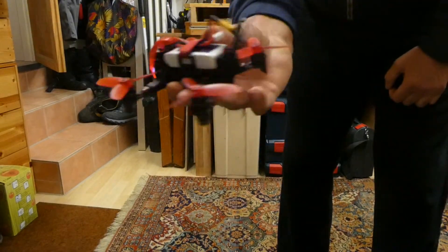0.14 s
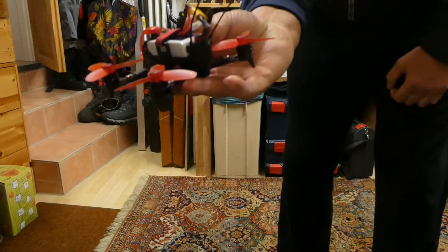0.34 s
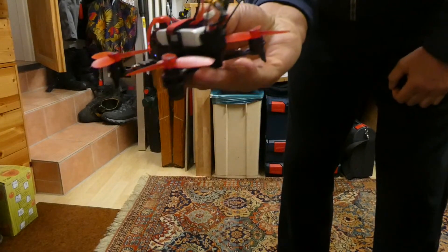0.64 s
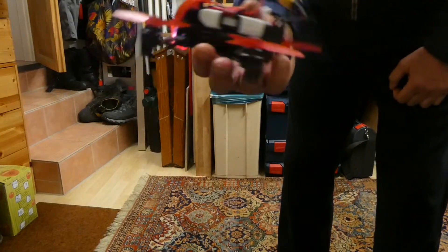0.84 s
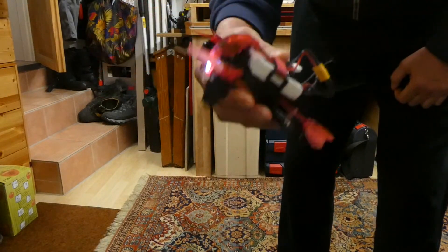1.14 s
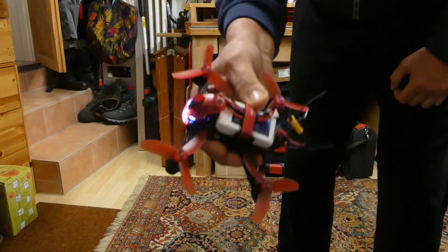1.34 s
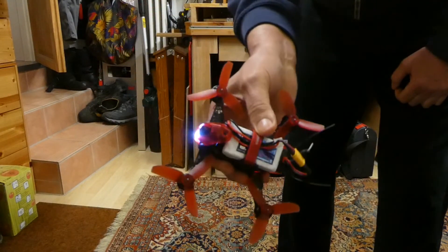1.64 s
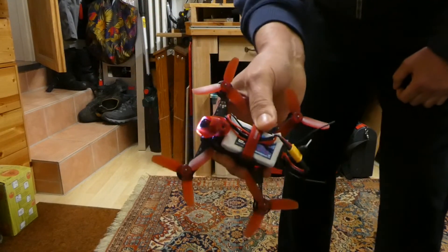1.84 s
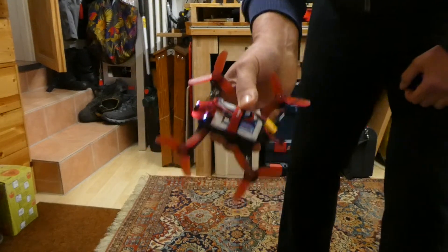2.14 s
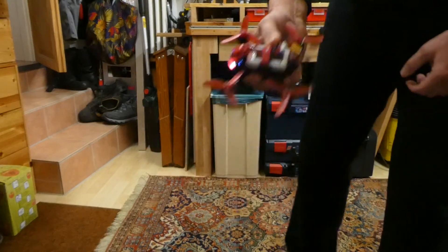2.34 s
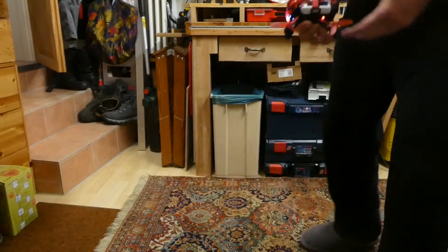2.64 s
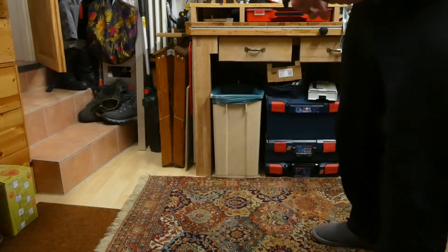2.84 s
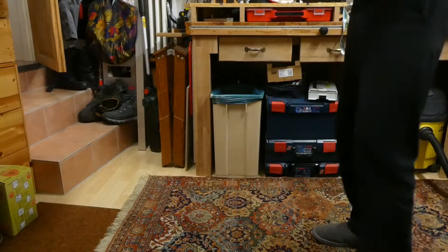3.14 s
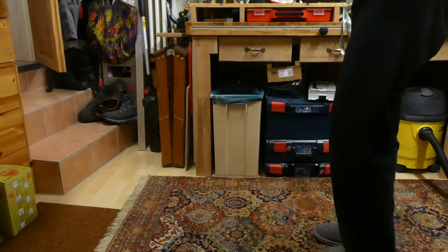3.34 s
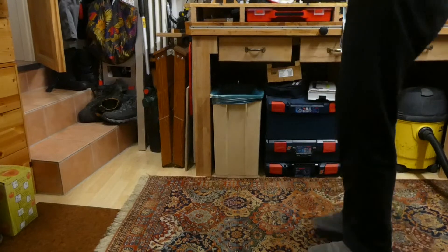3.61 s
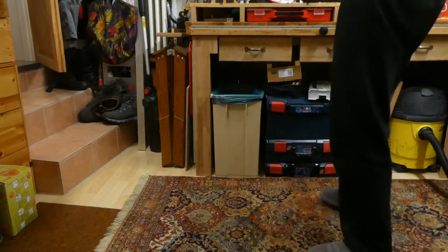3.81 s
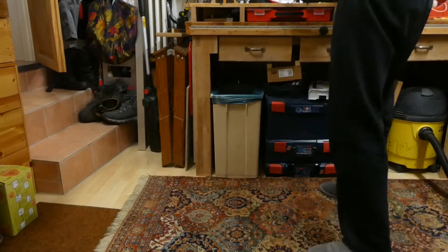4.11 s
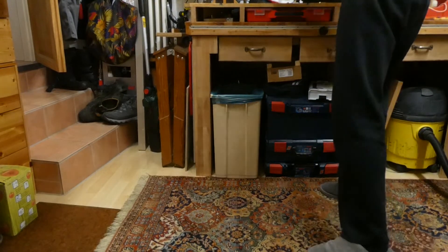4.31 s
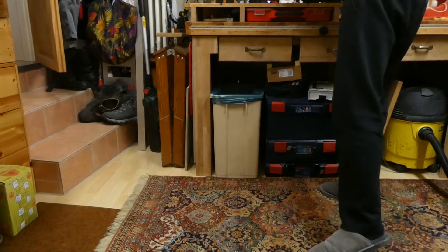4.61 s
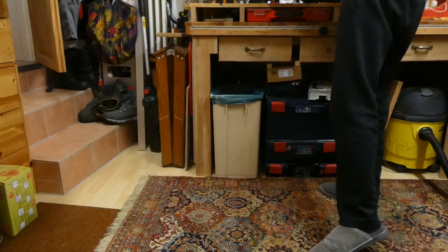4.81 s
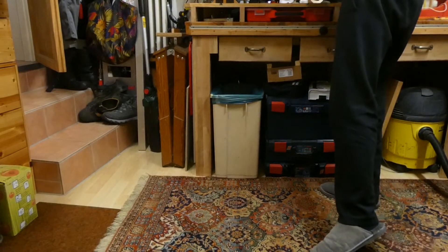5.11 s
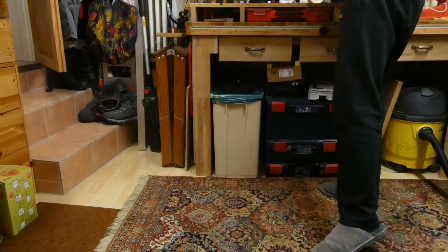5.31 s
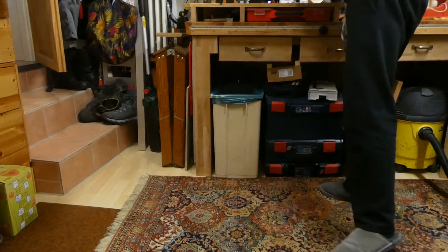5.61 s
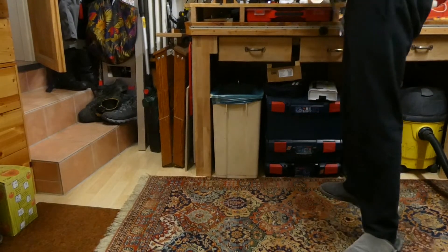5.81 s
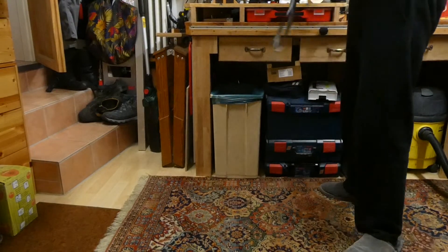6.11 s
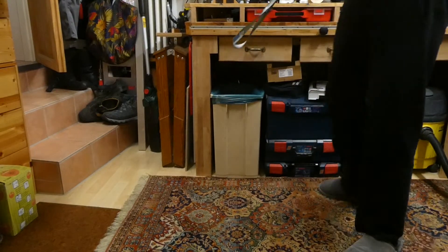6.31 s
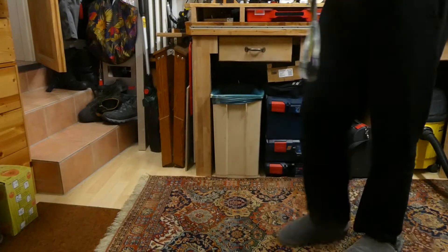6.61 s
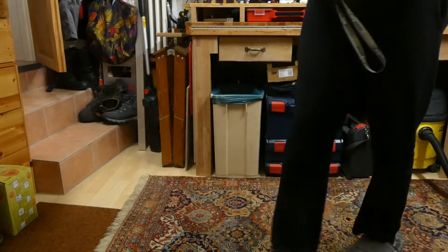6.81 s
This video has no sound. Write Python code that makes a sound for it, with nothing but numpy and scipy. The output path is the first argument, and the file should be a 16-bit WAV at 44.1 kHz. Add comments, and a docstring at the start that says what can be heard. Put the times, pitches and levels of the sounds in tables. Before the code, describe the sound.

Throughout about 7 seconds, a steady machine hum holds one middle pitch, with thin fan whine, low hollow air rush and soft hiss in a small hallway workshop. From 0.1 to 0.3 s a plastic model gives tiny dry ticks in the hand; faint brushing and thin squeaky hisses continue until 2.4 s. A small click comes at 2.7 s, then dull steps and knocks at about 3.0, 3.4, 3.7 and 4.0 s, while the hum dips slightly. After a woody knock at 4.4 s, an object rattles on the bench at 4.6 s and lands with the loudest, bright hard crack at 4.8 s, bouncing briefly. Soft rustles follow. Around 5.7 s come a clump of clicks and a swish, then a sharp click at 6.0 s and a duller one at 6.6 s, as a strap is handled. Echoes are short, the microphone fairly close.

```python
"""From the start machines hum as steady sines, over air rush and hiss made of coloured noise in a small hallway.
A small plastic model clicks in the hand as gritty noise puffs; soft noise strokes make rustles and faint squeaks.
Then come steps over a rug to a wooden bench, thuds and knocks of banded noise, while hum tones swell and dip.
A thing clatters down on the bench in a run of blows, each ringing decaying modes under a bright crack.
Last a strap is picked up, with more clicks, knocks and rustles; the handling echoes in the hallway."""
import sys
import numpy as np
from scipy import signal
from scipy.fft import rfft, irfft, next_fast_len
from scipy.io import wavfile
from scipy.ndimage import uniform_filter1d, map_coordinates

SR = 44100
rng = np.random.default_rng(int(sys.argv[2]) if len(sys.argv) > 2 else 0)


def dump_mix(stems):
    """Bounce the given channels to the path in sys.argv[1] as a 16-bit WAV at rate SR."""
    frames = np.atleast_2d(stems).T  # one column per channel
    limited = np.clip(frames, -1, 1)  # hard clip at full scale
    pcm = np.round(limited * 32767).astype(np.int16)
    wavfile.write(sys.argv[1], SR, pcm)


N = 306495

# Shaft tones of a fan. Each row: multiple of the shaft rate, level in dB rms, left over right in dB,
# left phase lead in radians.
FAN_TONES = [(30, -72, 0, 0), (36, -76, 0, 0), (45, -73, -7.7, .3), (48, -80, 1.5, -.3),
             (53, -75, -2.1, .2), (55, -76, -.6, .3), (62, -74, -3.2, .3), (63, -77, -2.7, .5),
             (64, -73, 1.4, .4), (65, -61.5, -.9, .3), (70, -72, -1.6, .5), (75, -66.5, -.5, .2),
             (80, -76, -.5, -.1), (90, -74, -7.2, -.6), (94, -77, 0, 0), (95, -73.5, -2.3, .1),
             (96, -77, -5.9, .3), (100, -79, -2.9, -.6), (105, -62, -.4, .1), (110, -79, 3.5, .3),
             (115, -80, 2.2, 0), (150, -84, 1.1, -.2)]
# A second motor's whine. Each row: harmonic number, level in dB rms, left over right in dB,
# left phase lead in radians.
WHINE_TONES = [(1, -56, -2, -.1), (2, -58, 1.1, -.7), (3, -72, -3, -.1), (4, -72, -.8, .7)]
# Sudden dips of the main hum, each held for a while, as the body stands in its standing wave.
# Each row: start in seconds, end in seconds, depth in dB.
HUM_DIPS = [(2.928, 4.163, 3.5), (6.53, 7.2, 5)]
# Single fan tones swell or sink as the body passes. Each shaft multiple has rows: middle in seconds,
# length in seconds, change in dB.
FAN_SWELLS = {65: [(.3, .6, -1), (1.45, 1.1, 3), (4, .9, 1), (5.6, .8, -4), (6.45, .3, 3)],
              75: [(1.7, 1, -4.5), (4.1, .5, -5.5), (6, .9, -4.5)], 95: [(1.9, 1.5, 10), (3.5, .5, 6),
              (5.9, .4, 6), (6.75, .8, 8)], 105: [(.5, .7, 2.5), (1.55, .7, 4), (5.5, .5, -2.5)]}
# Low room resonances that the air rush fills. Each row: centre in Hz, width in Hz, relative level in dB.
RUSH_MODES = [(76.4, 16.8, -5.5), (115, 62, -22), (195.4, 24.76, 2), (219.6, 25.3, -4), (272.2, 51, -13),
              (328.2, 42.9, 0.5), (388, 20.4, -3), (429.4, 68.5, -3), (486.1, 34.4, -3.5),
              (578.6, 65.4, -10), (700.8, 82, -8.5), (793.1, 53, -8.5), (962, 13.3, -8)]
# The rush's noise bed between those resonances. Each row: frequency in Hz, relative level in dB per Hz.
RUSH_BED = [(20, 0), (38, -4.5), (58, -28.5), (140, -33.5), (300, -20.5), (900, -23), (1100, -69)]
# Colour of the upper air noise and microphone hiss. Each row: frequency in Hz, relative level in dB per Hz.
HISS_COLOUR = [(500, -45.5), (900, 0.5), (1250, 3), (1600, -3.5), (2100, 0), (2550, -6.5), (3200, -11.5),
               (4500, -21.5), (6500, -23.5), (8200, -27), (10000, -22.5), (12500, -29), (15000, -31.5),
               (16000, -44)]
# Likeness of the two channels of noise. Each row: frequency in Hz, correlation from -1 to 1.
LIKENESS = [(60, -0.47), (130, -0.446), (290, 0.353), (640, -0.487), (1410, 0.25), (3100, 0.452),
            (6820, 0.504), (15000, 0.46)]
# Level of the treble noise over time, hiss with brief rises around the clatter and clicks.
# Each row: time in seconds, level in dB rms.
TREBLE_LEVEL = [(0, -66), (1.8, -67), (2.3, -64), (2.8, -64.5), (3.64, -63.5), (3.85, -65.5), (4.4, -66.5),
                (4.75, -60), (4.95, -65), (5.4, -63.5), (5.72, -61.5), (6.05, -66), (6.5, -63.5),
                (6.95, -63.5)]
# Dry clicks of plastic and buckle. Each row: start in seconds, body level in dB, body centre in Hz,
# body spread in octaves, snap level in dB.
CLICK_EVENTS = [(0.136, -74.5, 3000, .5, -49), (.2643, -72, 3000, .5, -52),
                (0.3035, -71.5, 3000, .5, -47.5), (2.7136, -66.5, 3000, .5, -48.5),
                (5.683, -44, 2200, 0.5, -51), (5.701, -38, 2214, 0.41, -62), (5.717, -36, 2120, 0.25, -61),
                (5.723, -39.5, 2075, .18, -65.5), (5.7717, -35.5, 1760, 0.45, -41),
                (6.0268, -34, 2890, 0.83, -37.5), (6.6412, -38, 1470, 0.71, -55.5),
                (6.652, -42.5, 785, 0.48, -59.5)]
# Soft strokes of noise: broad cloth rustles, and narrow faint hisses or squeaks. Each row: middle in seconds,
# level in dB, half length in seconds, centre in Hz, spread in octaves.
SOFT_STROKES = [(0.191, -67.5, 0.052, 10000, 0.41), (0.742, -60, 0.04, 11000, 1.16),
                (.88, -62, 0.021, 6700, .18), (.925, -62.5, 0.0375, 6700, 0.21),
                (1.748, -65.5, 0.068, 11000, 1.5), (2.148, -66, 0.078, 4830, 0.28),
                (2.357, -67.5, 0.243, 4720, 0.196), (2.78, -57, 0.108, 9000, 3.1),
                (3.439, -56.5, .04, 5000, 1.57), (3.729, -58.5, 0.0397, 7000, 1.7),
                (4.379, -65, 0.047, 7000, 1.3), (4.735, -60, .04, 12000, 0.43),
                (5.162, -60.5, .043, 8000, 2), (5.384, -59.5, .06, 7000, 2.9),
                (5.529, -62.5, 0.049, 5000, 1.53), (5.62, -65, 0.056, 9500, .5),
                (5.72, -44.5, 0.0422, 5000, 2.8), (5.868, -61, 0.106, 5000, 1.45),
                (6.74, -58, 0.0297, 9000, 2.1)]
# Knocks of feet and hands, mostly broad, with two narrow rings of the bench. Each row: start in seconds,
# level in dB, centre in Hz, spread in octaves.
KNOCK_EVENTS = [(2.955, -33, 686, 1.29), (2.975, -48, 1500, 0.9), (3.05, -42, 600, 0.75),
                (3.421, -36.5, 990, 1.02), (3.432, -35.5, 1066, 1.084), (3.511, -43.5, 800, 0.47),
                (3.706, -36, 697, 1.186), (3.722, -51.5, 1300, 1.0), (3.978, -41, 800, 1.12),
                (4.049, -40, 800, 1.01), (4.372, -36.5, 469, 0.23), (5.52, -45, 2050, 0.44),
                (5.71, -36.5, 474, 0.144), (5.865, -43.5, 1500, 0.93), (6.125, -50, 1200, 1.5)]
# Heel thuds. Each row: start in seconds, level in dB, centre in Hz.
HEEL_THUDS = [(2.956, -43.5, 171), (3.424, -40, 150), (3.985, -45, 85), (3.986, -34, 202),
              (4.06, -46.5, 110), (4.108, -48.5, 100)]
# Two drops on the bench with their bounces. Each row: start in seconds, level in dB,
# hardness from 0 (lands flat) to 1 (on a hard edge).
CLATTER_BLOWS = [(4.576, -25.5, 0.386), (4.583, -27, 0.048), (4.609, -28.5, 0.74), (4.617, -32.5, 0.071),
                 (4.635, -35, 0.047), (4.651, -28.5, 0.36), (4.676, -36.5, 0.085), (4.7727, -13.5, 0.913),
                 (4.783, -25, 0.022), (4.808, -23, 0.425), (4.828, -33, 0.0196), (4.851, -41, .02)]
# Modes of the bench and the dropped thing. Each row: frequency in Hz, relative level in dB,
# 60 dB decay time in seconds.
BENCH_MODES = [(240.5, -14, 0.119), (323.7, -12, 0.093), (361, -7.5, 0.094), (427.4, 6, 0.0713),
               (460.9, -7, 0.394), (494.6, 1, 0.176), (581, -9.5, 0.092), (629.3, -6.5, 0.073),
               (765, -15, 0.073), (899, -7, 0.113), (911.6, -1.5, 0.068), (1049, -1.5, 0.037),
               (1136, -10, 0.062), (1253.2, -0.5, 0.054), (1403.5, -5, 0.0385), (1600, -16, 0.049),
               (1677, -7.5, 0.042), (1921.3, -5.5, 0.0535), (2134, -1.5, 0.0208), (2373, -10.5, 0.019),
               (2690, -5, 0.038), (2917, -2.5, 0.021), (3630, -21.5, 0.019)]
# Colour of a blow's treble crack. Each row: frequency in Hz, relative level in dB.
CRACK_COLOUR = [(2300, -22), (3300, 6.5), (4100, -1), (5000, -3), (6300, 0.5), (7600, -8), (9500, -8.5),
                (11500, -14), (16000, -25)]
# Echo decay of the hallway. Each row: frequency in Hz, 60 dB decay time in seconds.
ROOM_DECAY = [(200, 0.418), (1000, 0.158), (4000, 0.145), (12000, 0.0954)]

HUM_HZ, SHAFT_HZ, WHINE_HZ = 423.87, 19.3336, 340.99
HUM_DB, DIP_RAMP_S = -42, 0.083
RUSH_DB, MID_DB = -47, -55.5
MID_FOLLOWS = 0.28  # share of the treble's level changes, in dB, that the middle band follows
STEP_ASIDE_S, UNSHADED_DB = 2.455, 1.5  # the body stops shading the microphones; the middle band rises
CLICK_T60_S, SNAP_HZ, SNAP_OCT = 0.1004, 9490, 0.6
SNAP_T60_S, HEAVY_DB = (0.0119, 0.0785), -55  # a snap rings longer on a body louder than this
KNOCK_T60_S, THUD_T60_S, THUD_OCT = 0.1004, 0.12, 0.245
# a blow landing flat, and on an edge: chatter t60 in seconds, low ring in dB, treble crack in dB
FLAT, EDGE = (0.1027, 5.8, -12.5), (0.047, -31, -5)
TICK_DB, TICK_HZ, TICK_T60_S = (-19.5, -2.5), 9166, 0.0189  # first touch; its level runs from flat to edge
TOP_HZ = 15700


def amp(db):
    """Gain of a level in dB."""
    return 10 ** (np.asarray(db) / 20)


def unit(x):
    """x at rms 1."""
    return x / np.sqrt(np.mean(x ** 2) + 1e-20)


def along(points, hz):
    """Reads (Hz, value) points at hz, on a log frequency axis."""
    f, v = np.transpose(points)
    return np.interp(np.log(hz + 1), np.log(f + 1), v)


def wobble(rate):
    """A smooth random curve, rate knots a second."""
    knots = rng.standard_normal(int(N * rate / SR) + 4)
    return map_coordinates(knots, [np.arange(N) * rate / SR])


def plateau(start, end, ramp):
    """Near 0 outside, near 1 between start and end, with smooth shoulders."""
    t = np.arange(N) / SR
    return (np.tanh((t - start) * 2 / ramp) - np.tanh((t - end) * 2 / ramp)) / 2


def filtered(x, response):
    """x shaped by a gain that depends on frequency."""
    n = x.shape[-1]
    m = next_fast_len(n + 8192)
    return irfft(rfft(x, m) * response(np.fft.rfftfreq(m, 1 / SR)), m)[..., :n]


def band(n, centre_hz, octaves, density=1):
    """n samples of noise, rms 1, in a bell-shaped band on a log axis; low density makes it gritty."""
    def bell(hz):
        distance = np.log2((hz + 1) / centre_hz) / max(octaves, .1)
        return np.exp(-.5 * distance ** 2) / np.sqrt(hz + 50)

    grains = rng.standard_normal(n) * (rng.random(n) < density)
    return unit(filtered(grains, bell))


def add(track, s, sound):
    """Mixes sound into track from second s on."""
    start = round(s * SR)
    part = track[..., start:start + sound.shape[-1]]
    part += sound[..., :part.shape[-1]]


def tone(hz, db, pan_db, lead):
    """A sine of fixed pitch, differing in level and phase between the two microphones."""
    side = np.array([[.5], [-.5]])
    phase = 2 * np.pi * (hz * np.arange(N) / SR + rng.random())
    return np.sqrt(2) * amp(db + pan_db * side) * np.sin(phase + lead * side)


def machines():
    """Rotating machines give pure tones; each drifts in level on its own, and standing waves shift some."""
    dips_db = sum(depth * plateau(start, end, DIP_RAMP_S) for start, end, depth in HUM_DIPS)
    out = tone(HUM_HZ, HUM_DB - dips_db + .6 * wobble(2.5), -.2, -.3)
    for order, db, pan_db, lead in FAN_TONES:
        swell_db = 0
        for middle, length, change in FAN_SWELLS.get(order, []):
            swell_db = swell_db + change * plateau(middle - length / 2, middle + length / 2, length / 2)
        drift_db = (.8 if order in FAN_SWELLS else 2.2) * wobble(1.465)
        out += tone(order * SHAFT_HZ, db + swell_db + drift_db, pan_db, lead)
    for harmonic, db, pan_db, lead in WHINE_TONES:
        out += tone(harmonic * WHINE_HZ, db + 0.65 * wobble(1.415), pan_db, lead)
    return out


def noise(gain, patchy_db):
    """Stereo noise, coloured by gain(Hz), with patches of random gain in time and frequency."""
    z = signal.stft(rng.standard_normal((2, N)), nperseg=512)[2]
    field = uniform_filter1d(rng.standard_normal(z.shape[1:]), 6, 0)
    field = uniform_filter1d(field, 14, 1)
    pair = signal.istft(z * amp(patchy_db * unit(field)), nperseg=512)[1][:, :N]

    def mid_side_gain(hz):
        turn = np.arccos(np.clip(along(LIKENESS, hz), -1, 1)) / 2  # sets the channels' correlation
        return gain(hz) * [np.cos(turn), np.sin(turn)]

    mid, side = filtered(pair, mid_side_gain)
    return np.array([mid + side, mid - side])


def air():
    """Turbulent air fills the room's low resonances; the treble noise above rises briefly around the handling."""
    times, levels = np.transpose(TREBLE_LEVEL)
    treble_db = np.interp(np.arange(N) / SR, times, levels)
    unshaded_db = UNSHADED_DB * plateau(STEP_ASIDE_S, 99, 0.31)
    mid_db = MID_DB + MID_FOLLOWS * (treble_db - treble_db.mean()) + unshaded_db
    hiss = noise(lambda hz: amp(along(HISS_COLOUR, hz)), patchy_db=1.47)
    treble = filtered(hiss, lambda hz: 1 / (1 + (4300 / (hz + 1)) ** 6))
    middle = hiss - treble

    def rush_gain(hz):
        modes = sum(amp(db) / (1 + (2 * (hz - centre) / width) ** 2) for centre, width, db in RUSH_MODES)
        return np.hypot(modes, amp(along(RUSH_BED, hz)))

    rush = amp(RUSH_DB + 0.8 * wobble(1.415)) * unit(noise(rush_gain, patchy_db=1.24))
    rush = rush * amp([[-.6], [.6]])  # leans right
    return rush + amp(mid_db) * unit(middle) + amp(treble_db) * unit(treble)


def contacts(rows, rise, density):
    """Each contact is a puff of noise that rises fast and dies away."""
    out, t = np.zeros(N), np.arange(SR // 3) / SR
    for s, db, hz, octaves, t60 in rows:
        envelope = amp(db - 60 * t / t60) * (1 - np.exp(-t / rise))
        add(out, s, envelope * band(len(t), hz, octaves, density))
    return out


def clicks():
    """A click is a banded noise puff for the part's body plus a bright, gritty snap."""
    bodies, snaps = [], []
    for s, db, hz, octaves, snap_db in CLICK_EVENTS:
        bodies.append((s, db, hz, octaves, CLICK_T60_S))
        snaps.append((s, snap_db, SNAP_HZ, SNAP_OCT, SNAP_T60_S[int(db > HEAVY_DB)]))
    body = contacts(bodies, rise=0.00079, density=0.34)
    return body + contacts(snaps, rise=0.000307, density=0.47)


def soft_strokes():
    """Noise swells and fades, its level jumping in clumps: broad as cloth rustles, narrow as hiss or squeak."""
    out = np.zeros(N)
    for s, db, half_length, hz, octaves in SOFT_STROKES:
        n = int(2 * half_length * SR)
        clumps = np.repeat(rng.standard_normal(n // 64 + 1), 64)[:n]
        stroke = amp(db + 0.82 * clumps) * np.hanning(n)
        add(out, s - half_length, stroke * band(n, hz, octaves))
    return out


def knocks():
    """Hands and soles knock, mostly broadly; two narrow bands ring like the bench; heels thud low."""
    struck = [row + (KNOCK_T60_S,) for row in KNOCK_EVENTS]
    low = [row + (THUD_OCT, THUD_T60_S) for row in HEEL_THUDS]
    return contacts(struck, rise=0.00502, density=.3) + contacts(low, rise=0.0074, density=1.0)


def clatter():
    """Each blow rings the bench's low modes; a dying chatter of tiny blows rings the rest and cracks."""
    out, t = np.zeros(N), np.arange(SR // 2) / SR
    hz, level_db, t60 = np.transpose(BENCH_MODES)[..., None]
    sign = (-1) ** np.arange(len(BENCH_MODES))[:, None]  # neighbouring modes swing in opposition
    low = hz[:, 0] < 620
    for s, db, hard in CLATTER_BLOWS:
        mix = np.clip(hard, 0, 1)
        chatter_t60, low_db, crack_db = np.add(FLAT, mix * np.subtract(EDGE, FLAT))
        fade = amp(-60 * t / chatter_t60) * (1 - np.exp(-t / 0.00132))
        blows = rng.standard_normal(len(t)) * (rng.random(len(t)) < .12)  # sparse and uneven
        scatter_db = 2.5 * rng.standard_normal(hz.shape)  # every blow excites the modes differently
        modes = sign * amp(level_db + scatter_db - 60 * t / t60) * np.sin(2 * np.pi * hz * t)
        wood = amp(low_db) * (1 - np.exp(-t / 0.00185)) * modes[low].sum(0)
        strikes = fade * blows / np.linalg.norm(fade * blows)
        chatter = signal.fftconvolve(strikes, modes[~low].sum(0))[:len(t)]
        rattle = amp(0.5) * fade * band(len(t), 1100 + 900 * hard, 0.818)
        crack = amp(crack_db) * fade * unit(filtered(blows, lambda f: amp(along(CRACK_COLOUR, f))))
        tick_fade = amp(np.interp(hard, [0, 1], TICK_DB) - 60 * t / TICK_T60_S)
        tick = tick_fade * (1 - np.exp(-t / 0.00111)) * band(len(t), TICK_HZ, 0.158, 0.44)
        add(out, s, amp(db) * (wood + chatter + rattle + crack + tick))
    too_small_for_bass = signal.butter(3, 200, "high", fs=SR, output="sos")
    return signal.sosfilt(too_small_for_bass, out)


def room(x):
    """Each frequency of the hallway's answer dies at its own speed; close microphones hear much the same."""
    hz, t, z = signal.stft(rng.standard_normal((2, SR // 2)), SR, nperseg=256)
    decay = amp(-60 * t / along(ROOM_DECAY, hz)[:, None])
    mid, side = signal.istft(z * decay, SR, nperseg=256)[1]
    tail = np.array([mid + 0.338 * side, mid - 0.58 * side])
    delayed = np.pad(x, (250, 0))[None]  # samples before the echo starts
    return signal.fftconvolve(delayed, tail / np.linalg.norm(tail[0]), axes=1)[:, :N]


def scene():
    """Hum and air fill the room; the handling has a direct path and an echo, leaning right in the low mids."""
    near = clicks() + soft_strokes() + knocks() + clatter()
    right_db = [(100, -1.66), (700, 3.0), (2500, 1.32), (15000, -1.3)]  # Hz, right over left in dB
    lean = lambda hz: amp([[-.5], [.5]] * along(right_db, hz))
    return machines() + air() + filtered(near + amp(-8.5) * room(near), lean)


def record(dry):
    """High peaks are rounded off; the microphones drop the deep bass and all above their band limit."""
    rounded = dry / (1 + np.abs(dry / .85) ** 4) ** (1 / 4)
    return filtered(rounded, lambda hz: (hz < TOP_HZ) / np.sqrt(1 + (120 / (hz + 1)) ** 4))


dry = scene()
out = record(dry)
dump_mix(out)
```